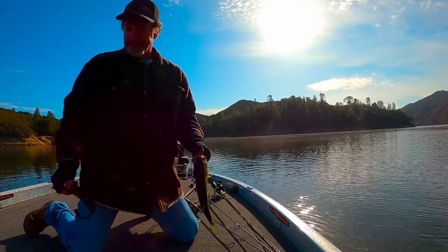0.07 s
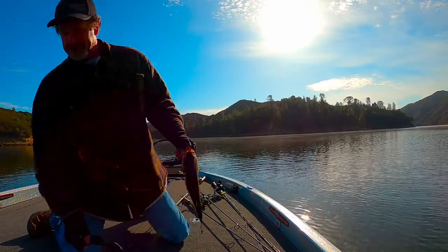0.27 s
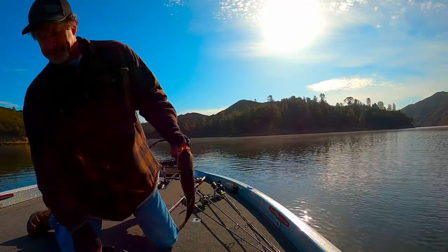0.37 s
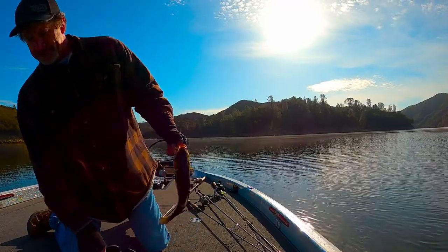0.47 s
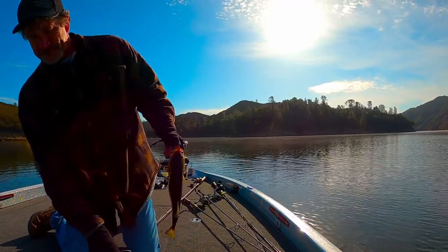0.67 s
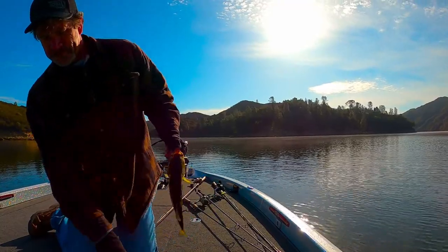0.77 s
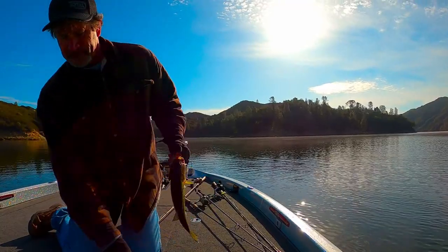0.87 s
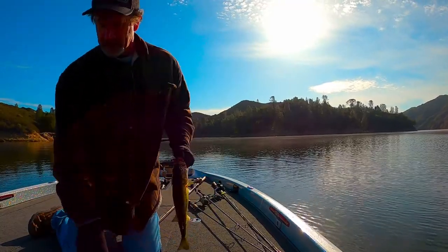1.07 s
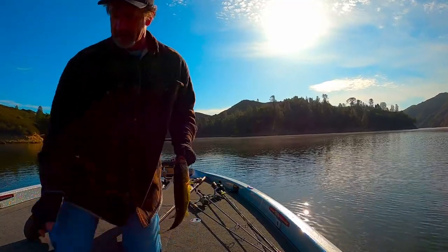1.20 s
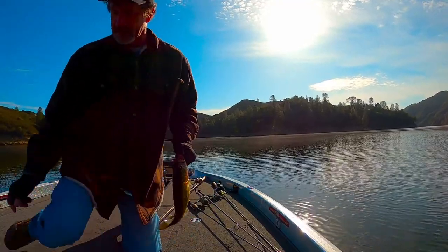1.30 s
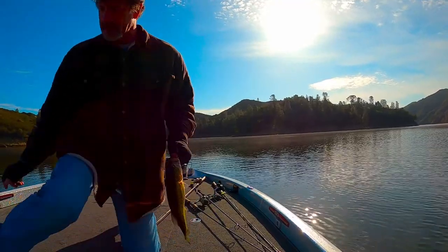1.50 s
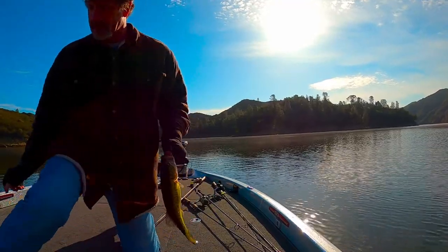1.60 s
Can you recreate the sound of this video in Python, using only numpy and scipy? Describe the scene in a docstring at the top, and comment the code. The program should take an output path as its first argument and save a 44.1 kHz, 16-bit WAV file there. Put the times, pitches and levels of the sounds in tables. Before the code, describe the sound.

Someone shifts on their knees aboard a small boat: soft bumps, a deep thud, trousers and jacket brushing, a loud clack with brief rattle, then lighter bumps fading, heard close up in quiet open air.

```python
"""Soft thumps come first, then a heavy one, as someone shifts on their knees on a small boat's carpeted deck.
Each thump booms a deck panel and rings the hollow hull, both made from fading sine waves.
One hard knock stands out, with small taps around it: fading tones, a noise wash and a bright tick.
Shaped noise makes trousers dragging on carpet, a jacket swishing, low hull rumble and a faint outdoor hiss.
Wobbling low tones make the deck's soft creaks, and a scatter of tiny ticks makes loose gear chatter."""
import sys
import numpy as np
from scipy import signal
from scipy.fft import rfft, irfft
from scipy.io import wavfile

SR = 44100
rng = np.random.default_rng(int(sys.argv[2]) if len(sys.argv) > 2 else 0)


def waveform_to_disk(signal):
    """Save audio, clipped to [-1, 1], as 16-bit WAV at the path in sys.argv[1]."""
    frames = np.transpose(np.atleast_2d(signal))
    scaled = np.clip(frames, -1, 1) * 32767
    samples = np.round(scaled).astype(np.int16)
    wavfile.write(sys.argv[1], SR, samples)


N = 72765
TIME = np.arange(N) / SR   # seconds

# A t60 is the time a ring takes to fall by 60 dB. Left-right levels are positive when left is louder.

# Outdoor hiss, its tone colour: pitch_hz, level_db per Hz (relative)
AIR_COLOUR = [(25, -1), (60, -0.5), (110, 1.5), (170, 3.5), (360, -4), (850, -11), (1300, -7), (2850, -14),
              (3800, -16), (5140, -15.5), (8580, -21), (9900, -28.5), (13500, -36.5), (15500, -60)]
AIR_DB = -67.5
# How alike left and right noise are: pitch_hz, correlation (no unit)
LIKENESS = [(60, 0.79), (250, 0.44), (600, 0.77), (2000, 0.68), (6000, 0.71), (14000, 0.38)]

# Low rumble of the rocking hull over time: time_s, level_db (before left and right are averaged)
ROCKING = [(0, -78), (0.19, -51), (0.43, -44.5), (0.52, -64.5), (0.65, -66.5), (0.8, -43.5), (0.92, -51),
           (1.02, -66), (1.2, -61.5), (1.4, -52), (1.47, -78), (1.65, -67)]
# Tone colour of that rumble: pitch_hz, level_db per Hz (relative)
ROCKING_COLOUR = [(20, 1), (35, -7.5), (60, -4), (90, -21), (150, -38), (400, -64), (1500, -96)]

# Soft creaks of the loaded deck: start_s, length_s, level_db, pitch_hz
CREAKS = [(0.328, 0.033, -46.5, 278), (0.59, 0.031, -54, 345), (0.668, 0.037, -47, 188),
          (0.741, 0.034, -45, 250), (0.945, 0.025, -52.5, 339), (0.978, 0.024, -56.5, 335),
          (1.009, 0.042, -61, 342), (1.324, 0.042, -50.5, 235)]
CREAK_JITTER, CREAK_JITTER_RATE_HZ = 0.1, 200   # jitter is a fraction of the pitch
CREAK_OVERTONE_DB = -26

# Jacket swishes: peak_s, level_db, rise_s, fall_s, tilt_db per octave, weave_hz, weave_db
SWISHES = [(0.195, -61, 0.032, 0.063, 1.1, 2900, 12), (0.66, -55.5, 0.026, 0.064, -0.5, 2050, 5),
           (0.708, -51, 0.048, 0.028, 0.3, 8700, 5.5), (0.76, -51.5, 0.041, 0.046, -2.04, 2650, 9),
           (0.9, -69, 0.28, 0.11, 3, 2700, 4), (1.195, -63, 0.048, 0.038, 3, 2700, 5),
           (1.53, -74, 0.18, 0.22, 8.5, 2600, -4.5)]
# Trousers dragging on carpet: peak_s, level_db, rise_s, fall_s, tilt_db per octave, weave_hz, weave_db
DRAGS = [(0.265, -60.5, 0.066, 0.11, 2.5, 3020, 4), (0.377, -47, 0.033, 0.028, -0.5, 11300, 9.5),
         (0.415, -54.5, 0.051, 0.036, 0, 1180, 3.5), (0.53, -56, 0.047, 0.063, 1.3, 12000, 6.5),
         (0.585, -53, 0.066, 0.041, -0.3, 6200, 4.5), (1.09, -52.5, 0.011, 0.023, 0.8, 2600, -1),
         (1.329, -53.5, 0.014, 0.011, 3.7, 2700, -1.5)]
# Tone colour of the jacket: pitch_hz, level_db per Hz (relative)
SWISH_COLOUR = [(150, 3), (280, -7), (450, -12), (700, -14), (1200, -4.5), (1900, -6), (2600, -9),
                (3500, -20), (4600, -12.5), (6300, -19), (8500, -25.5), (10000, -40.5), (15000, -46)]
# Tone colour of the trousers: pitch_hz, level_db per Hz (relative)
DRAG_COLOUR = [(150, -14), (250, -8), (434, -7.5), (573, -4), (795, -9), (1100, -4.5), (1220, -1.5),
               (1890, -7.5), (2400, -4.5), (4240, -20), (6100, -16), (12200, -33), (15500, -49)]
SWISH_PAN_DB, DRAG_PAN_DB = 3, 2.1
WEAVE_OCTAVES = 0.26   # how far the raspy weave band spreads to each side

# Hard contacts: start_s, level_db, brightness_hz, hull_ring_db, left_minus_right_db,
# struck_spot_hz, struck_spot_ring_db, surface_tick_db
KNOCKS = [(0.2185, -39.5, 9100, -66, 1, 2610, -40, -42), (0.2247, -41, 1168, -39.5, 6, 1005, -34, -72),
          (0.935, -67, 8000, -66, 9, 5340, -63, -56), (0.945, -65, 5000, -60, 6, 1150, -58, -54),
          (1.053, -41, 3000, -55, 0, 700, -46, -66), (1.0652, -14, 9300, -27.5, -1, 1910, -25, -32.5),
          (1.0837, -37.5, 2200, -30.5, 4, 700, -28.5, -49), (1.0978, -29, 3580, -37.5, 1, 680, -37.5, -44),
          (1.301, -45, 1980, -65, 6, 1061, -54, -67), (1.389, -59, 1970, -78, 1, 1220, -60, -77),
          (1.4079, -43.5, 1840, -65, 1, 1260, -48.5, -64)]
# Tones of a hard contact: pitch_hz, level_db (relative), t60_s
CLACK = [(1057, -31, 0.049), (1319, -16, 0.038), (1545, -17.5, 0.041), (1722, -15.5, 0.025),
         (1818, -11.5, 0.023), (1930, -9.5, 0.01), (2160, -19.5, 0.013), (2600, -26, 0.017),
         (3290, -20, 0.015), (4990, -14, 0.0065), (5600, -17.5, 0.0065), (6800, -15, 0.0055),
         (8600, -16, 0.0049)]
# Noise wash of the many higher deck tones, its colour: pitch_hz, level_db per Hz (relative)
WASH_COLOUR = [(100, 0), (400, 0.5), (800, -6), (1100, -4.5), (1800, 4.5), (2600, -10.5), (3800, -19),
               (6000, -10.5), (9000, -29), (15000, -20)]
# How long the wash lasts: pitch_hz, t60_s
WASH_T60 = [(200, 0.24), (700, 0.076), (1800, 0.041), (4000, 0.016), (12000, 0.02)]
WASH_DB = -9.5   # relative to the knock
TOUCH_S = 0.00026   # the wash builds up over this time
SPOT_T60_S = 0.02
TICK_LOW_HZ, TICK_HIGH_HZ, TICK_DECAY_S = 2460, 8160, 0.0016
# Loose gear chattering, its level relative to the hardest knock
RATTLE_DB, RATTLE_LOSS_DB_PER_S = -35, 224
RATTLE_PER_S, RATTLE_S = 350, 0.024   # average touches per second, and how long they go on

# Weight landing on the deck: start_s, level_db, panel_pitch_hz, panel_t60_s, hull_ring_db (before softening)
THUMPS = [(0.002, -31.5, 91.5, 0.093, -56.5), (0.032, -35, 85.6, 0.11, -81), (0.083, -51, 94, .22, -79),
          (0.219, -15, 31.1, 0.33, -40.5), (0.24, -17, 50.2, 0.18, -51.5), (0.333, -35, 66, 0.41, -77),
          (0.378, -34, 38.6, 0.13, -47.5), (0.687, -37.5, 72.7, 0.34, -50.5),
          (0.711, -33.5, 58, 0.31, -50.5), (0.746, -34, 71.6, 0.3, -49), (0.801, -40, 72, 0.082, -58),
          (0.841, -33, 28.7, .28, -71), (0.913, -51, 56.4, .15, -82), (1.068, -22.5, 112.8, 0.15, -36.5),
          (1.086, -18.5, 101, 0.047, -26), (1.097, -19.5, 114.5, 0.092, -27.5),
          (1.179, -36, 139.6, 0.2, -47), (1.188, -29.5, 126, 0.086, -45.5),
          (1.231, -44.5, 71.6, 0.097, -57.5), (1.318, -30.5, 46.1, 0.22, -58),
          (1.338, -35.5, 48.7, 0.22, -52), (1.411, -48.5, 75, 0.069, -57), (1.559, -62.5, 169, 0.24, -62.5)]
# Tones of the hollow hull: pitch_hz, level_db (relative), t60_s
HULL = [(132, -9.5, 0.56), (153.5, -7.5, 0.26), (193.4, -14.5, 0.49), (217.5, -7.5, 0.24),
        (238.4, -5.5, 0.12), (282.6, -9, 0.18), (335, 0, 0.061), (383, -11, 0.08), (417, -19, 0.12),
        (489, -10.5, 0.096), (570, -17.5, 0.09), (700, -23, 0.093), (736, -21, 0.097), (766, -15.5, 0.073),
        (960, -54, 0.07)]
PANEL_GIVE_HZ, SOFT_CONTACT_HZ = 280, 306   # sound above these is softened

# Left-right balance of all deck sounds: pitch_hz, left_minus_right_db
EAR_BALANCE = [(30, 4.5), (120, 0.7), (300, 1.5), (600, -2), (1100, 0.2), (2200, 7), (5000, 0), (9000, 2),
               (13000, 0)]
LEFT_LAG_S = 0.000016
LOW_CUT_HZ, TOP_STOP_HZ = 21, 17200   # at the top stop the sound is already 70 dB down


def from_db(db):
    """Turn decibels into a multiplier."""
    return 10 ** (np.asarray(db) / 20)


def rms_one(x):
    """Scale a signal to an average (rms) strength of one."""
    return x / np.sqrt(np.mean(x ** 2) + 1e-20)


def at_hz(points, hz):
    """Read a table between its points, spacing pitches as the ear does (logarithmically)."""
    table_hz, values = np.transpose(points)
    return np.interp(np.log(hz), np.log(table_hz), values)


def pan(db):
    """Give left and right multipliers for a level difference, half on each side."""
    return from_db(np.array([[0.5], [-0.5]]) * db)


def lowpass(x, hz):
    """Soften the sound above a given pitch."""
    sos = signal.butter(2, min(hz, SR / 2 - 100), fs=SR, output="sos")
    return signal.sosfilt(sos, x + 1e-18)


def click(s, db):
    """Make a single-sample blow, used to strike the ringing tones."""
    return from_db(db) * (np.arange(N) == max(int(s * SR), 0))


def ring(x, modes):
    """Let x strike a set of tones, each a sine wave that dies away at its own speed."""
    out = 0
    for hz, db, t60 in modes:
        shrink = np.exp(-np.log(1000) / (t60 * SR))   # loss per sample
        turn = 2 * np.pi * hz / SR   # angle per sample
        feedback = [1, -2 * shrink * np.cos(turn), shrink * shrink]
        out = out + from_db(db) * signal.lfilter([0, np.sin(turn)], feedback, x + 1e-18)
    return out


def ring_alternating(x, modes):
    """Ring the tones with every second one upside down, since modes can move in opposite directions."""
    return ring(x, modes[::2]) - ring(x, modes[1::2])


def flutter(rate):
    """Make a random wobble of rms one from points joined by lines, rate points per second."""
    knots = rng.standard_normal(4096)
    return rms_one(np.interp(TIME * rate, np.arange(len(knots)), knots))


def noise_bands(colour):
    """Split stereo noise into third-octave bands that sum to rms one; return centre pitches and bands."""
    edges = 22 * 2 ** (np.arange(30) / 3)
    centres = np.sqrt(edges[1:] * edges[:-1])
    white = rng.standard_normal((2, 2, N))
    bands = []
    for k, hz in enumerate(centres):
        sos = signal.butter(3, edges[k:k + 2], "band", fs=SR, output="sos")
        mid, side = signal.sosfilt(sos, white[k % 2])   # neighbouring bands use separate noise
        alike = np.clip(at_hz(LIKENESS, hz), 0, 1)
        low_fade = min(1, hz / colour[0][0]) ** 2   # fades below the table's lowest pitch
        gain = from_db(at_hz(colour, hz)) * low_fade
        shared = np.sqrt(1 + alike) * mid
        opposite = np.sqrt(1 - alike) * side * [[1], [-1]]
        bands.append(gain * (shared + opposite))
    return centres, np.array(bands) / np.std(sum(bands))


def air():
    """Outdoor air is a faint, steady hiss made of noise."""
    _, bands = noise_bands(AIR_COLOUR)
    return from_db(AIR_DB) * bands.sum(axis=0)


def rocking():
    """The hull rumbles as weight moves on it: low noise that swells and fades."""
    _, bands = noise_bands(ROCKING_COLOUR)
    rumble = bands.sum(axis=(0, 1)) / 2   # average of left and right
    return from_db(np.interp(TIME, *np.transpose(ROCKING))) * rumble


def creaks():
    """Panels stick and slip at an uneven rate, in short low groans."""
    out = 0
    for s, length, db, hz in CREAKS:
        slip_hz = hz * (1 + CREAK_JITTER * flutter(CREAK_JITTER_RATE_HZ))
        phase = 2 * np.pi * np.cumsum(slip_hz) / SR
        progress = np.clip((TIME - s) / length, 0, 1)
        load = np.sqrt(np.abs(np.sin(np.pi * progress)))
        groan = np.sin(phase) + from_db(CREAK_OVERTONE_DB) * np.sin(2 * phase)
        out = out + from_db(db) * load * groan
    return out


def rubbing(strokes, colour, grain_db, grain_rate):
    """Rubbing cloth hisses with each stroke; catching fibres roughen it and the weave adds a raspy band."""
    centres, bands = noise_bands(colour)
    octaves = np.log2(centres / 2000)   # the tilt pivots at 2000 Hz
    power = 0
    for s, db, rise, fall, tilt_db, weave_hz, weave_db in strokes:
        weave = np.exp(-(np.log2(centres / weave_hz) / WEAVE_OCTAVES) ** 2)
        speed = np.exp(-((TIME - s) / np.where(TIME < s, rise, fall)) ** 2)
        band_gain = from_db(db + tilt_db * octaves + weave_db * weave)
        power = power + np.outer(band_gain, speed) ** 2
    rub = np.einsum("bcn,bn->cn", bands, np.sqrt(power))   # shape each band, then add them up
    return rub * from_db(grain_db * flutter(grain_rate))


def jacket_swishes():
    """Jacket cloth rubs with a gentle, slower grain."""
    return pan(SWISH_PAN_DB) * rubbing(SWISHES, SWISH_COLOUR, grain_db=1.0, grain_rate=250)


def trouser_drags():
    """Trousers rub over the carpet with a rougher, faster grain."""
    return pan(DRAG_PAN_DB) * rubbing(DRAGS, DRAG_COLOUR, grain_db=1.49, grain_rate=500)


def rattle():
    """The hardest knock sets loose gear chattering for a moment, in uneven ticks."""
    s, db = max(KNOCKS, key=lambda row: row[1])[:2]
    age = np.clip(TIME - s, 0, 1)
    touches = (rng.random(N) < RATTLE_PER_S / SR) * (age > 0) * (age < RATTLE_S)
    strength = rng.standard_normal(N) / 2   # random size and direction
    fading = from_db(db + RATTLE_DB - RATTLE_LOSS_DB_PER_S * age)
    return ring(touches * strength * fading, CLACK)


def tick(s, db):
    """Two hard surfaces meet in a very short bright crackle."""
    age = TIME - s
    crackle = rng.standard_normal(N) * (age > 0) * np.exp(-np.abs(age) / TICK_DECAY_S)
    band = signal.butter(2, [TICK_LOW_HZ, TICK_HIGH_HZ], "band", fs=SR, output="sos")
    return from_db(db) * signal.sosfilt(band, crackle + 1e-18)


def knocks():
    """A hard contact clacks, rings the struck spot and hull, and leaves a wash whose pitches fade at own rates."""
    centres, bands = noise_bands(WASH_COLOUR)
    age = TIME[:SR // 2]   # each wash lasts at most half a second
    fade = np.exp(-np.log(1000) * age / at_hz(WASH_T60, centres)[:, None])
    decay = fade * (1 - np.exp(-age / TOUCH_S))
    out = 0
    for s, db, bright_hz, hull_db, pan_db, spot_hz, spot_db, tick_db in KNOCKS:
        start = int(s * SR)
        size = min(len(age), N - start)
        stop = start + size
        wash = np.zeros((2, N))
        wash[:, start:stop] = np.einsum("bcn,bn->cn", bands[:, :, start:stop], decay[:, :size])
        clack = ring_alternating(click(s, db), CLACK)
        hull = ring_alternating(click(s, hull_db), HULL)
        spot = ring(click(s, spot_db), [(spot_hz, 0, SPOT_T60_S)])
        contact = pan(pan_db) * (clack - spot + from_db(db + WASH_DB) * wash)
        out = out + lowpass(hull + contact, bright_hz) + tick(s, tick_db)
    return out


def thumps():
    """A padded blow bends the panel under it and wakes the low hull tones."""
    panels = sum(ring(click(s, db), [(hz, 0, t60)]) for s, db, hz, t60, _ in THUMPS)
    blows = sum(click(s, hull_db) for s, _, _, _, hull_db in THUMPS)
    hull = ring(lowpass(blows, SOFT_CONTACT_HZ), HULL)
    return lowpass(panels, PANEL_GIVE_HZ) + hull


def shade(x):
    """The left and right microphone ports favour different pitches."""
    hz = np.maximum(np.fft.rfftfreq(N, 1 / SR), 1)
    return irfft(rfft(x) * pan(at_hz(EAR_BALANCE, hz)), N)


def scene():
    """Deck and clothes reach the left port slightly late; the air hiss is added without that delay."""
    clothes = trouser_drags() + jacket_swishes()
    deck = shade(thumps() + knocks() + rattle() + creaks() + rocking())
    left, right = deck + clothes
    late_left = np.interp(TIME - LEFT_LAG_S, TIME, left)
    return np.array([late_left, right]) + air()


def record(dry):
    """Trim the deepest bass and cut the top steeply."""
    bass_trim = signal.butter(1, LOW_CUT_HZ, "high", fs=SR, output="sos")
    top_cut = signal.cheby2(12, 70, TOP_STOP_HZ, fs=SR, output="sos")
    return signal.sosfilt(top_cut, signal.sosfilt(bass_trim, dry))


dry = scene()
out = record(dry)
waveform_to_disk(out)
```